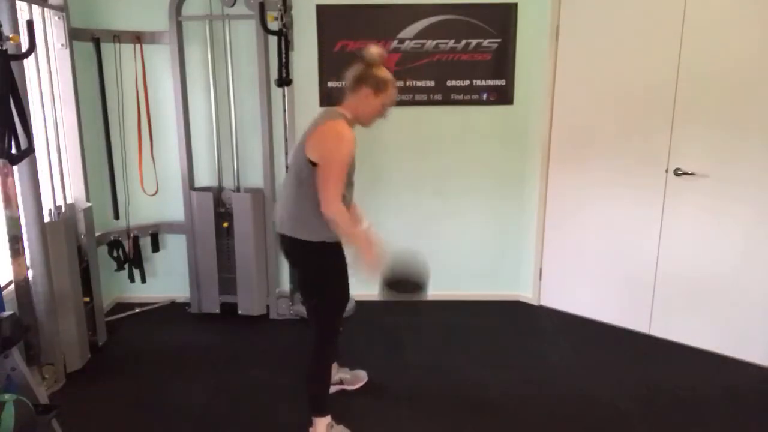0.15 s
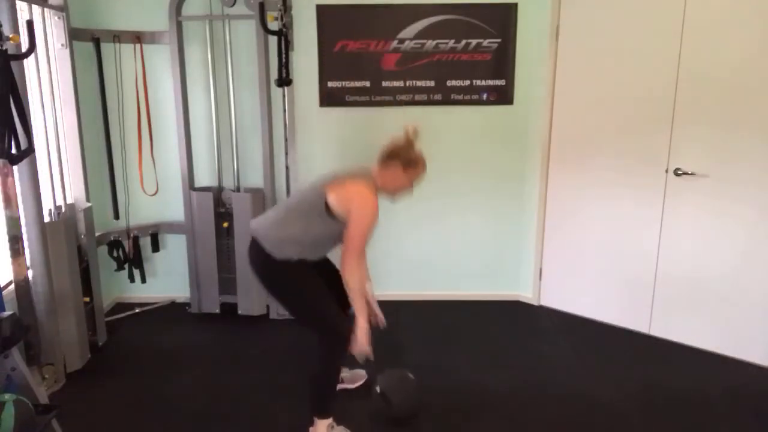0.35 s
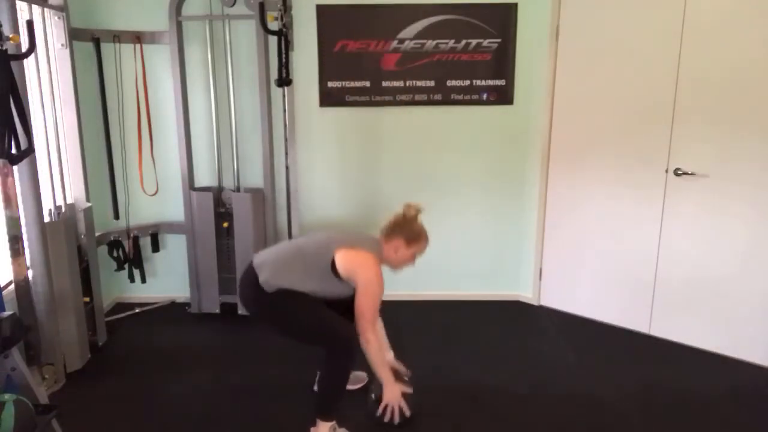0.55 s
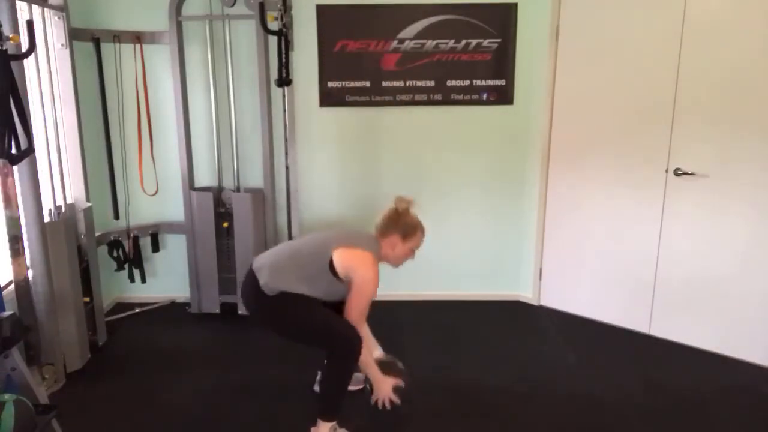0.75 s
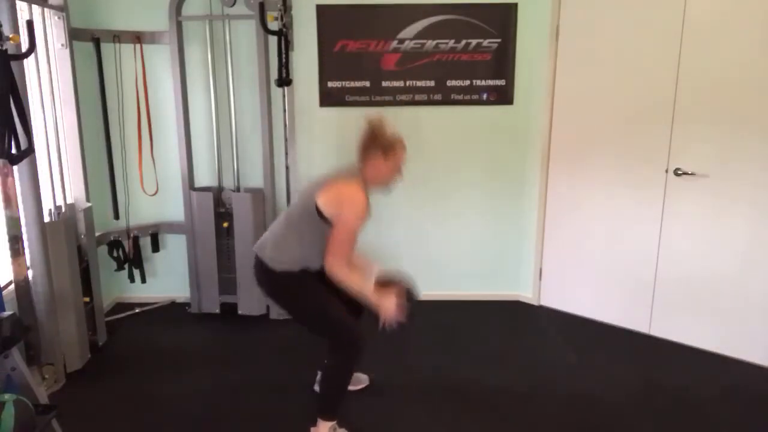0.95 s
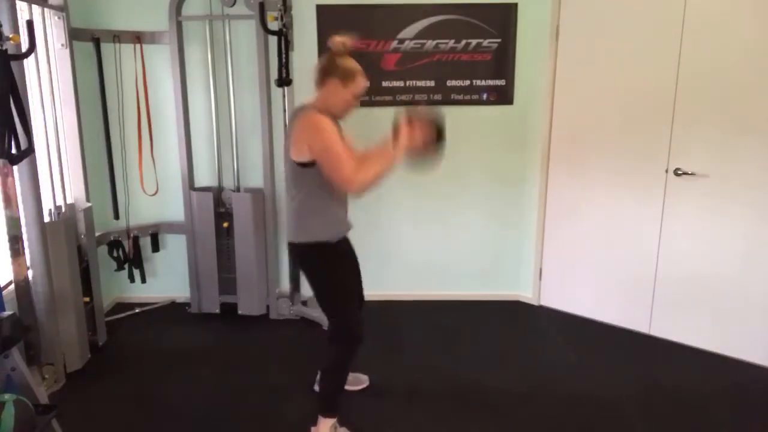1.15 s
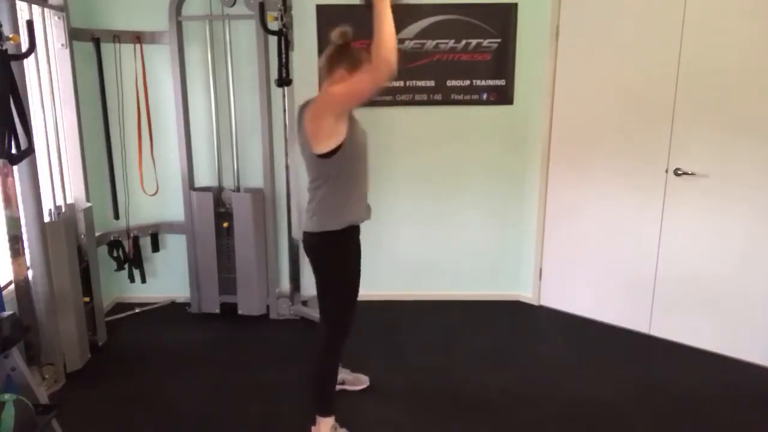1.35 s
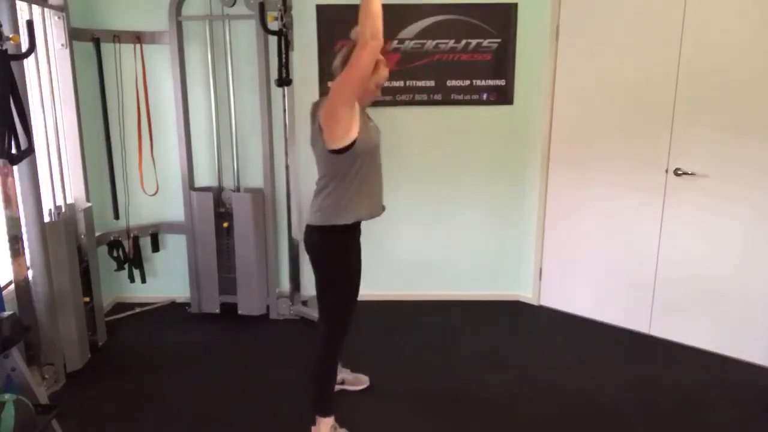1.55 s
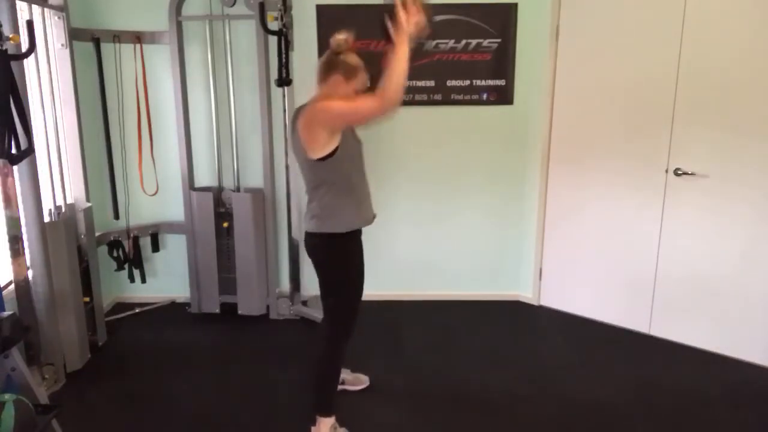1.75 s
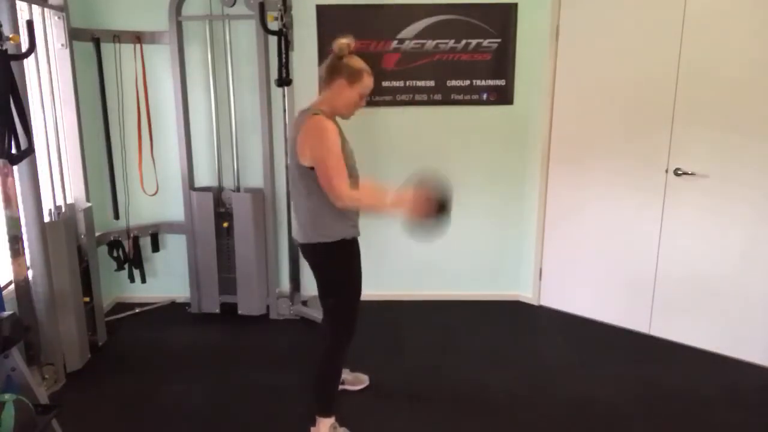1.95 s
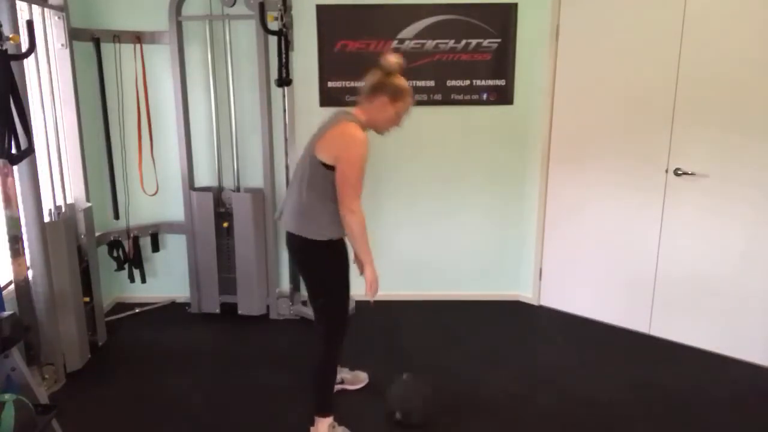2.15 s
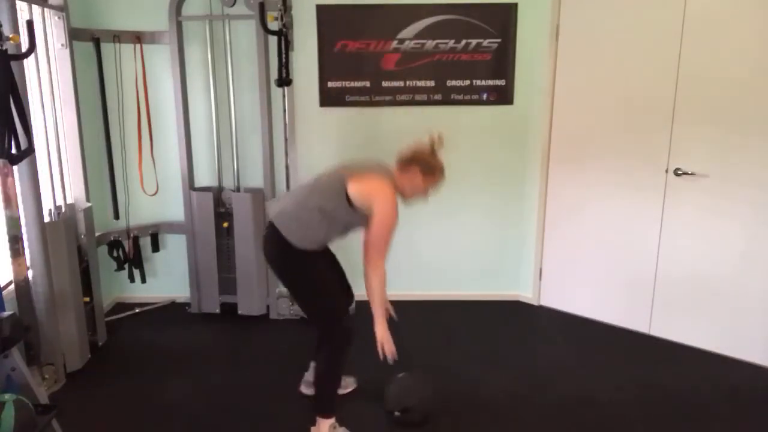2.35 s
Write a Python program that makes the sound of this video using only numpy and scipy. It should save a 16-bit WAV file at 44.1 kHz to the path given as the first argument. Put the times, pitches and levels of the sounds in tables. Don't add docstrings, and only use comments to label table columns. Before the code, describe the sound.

A heavy rubber slam ball hits a gym floor mat twice, each crack ringing through the room

```python
import sys
import numpy as np
from scipy import signal
from scipy.fft import rfft, irfft
from scipy.io import wavfile
from scipy.ndimage import uniform_filter1d

SR = 44100
rng = np.random.default_rng(int(sys.argv[2]) if len(sys.argv) > 2 else 0)


def wrap_up_sound(samples):
    columns = np.atleast_2d(samples).T
    tamed = np.clip(columns, -1, 1)
    steps = np.round(tamed * 32767).astype(np.int16)
    wavfile.write(sys.argv[1], SR, steps)


def voltage_ratio(decibels):
    exponent = np.asarray(decibels, float) / 20
    return 10 ** exponent


N = 110250
T = np.arange(N) / SR
BUILD_S = 0.0018


def level(x, db):
    return x * voltage_ratio(db) / np.sqrt(np.mean(x ** 2))


def read(table, hz):
    table = np.array(table, float)
    return np.interp(np.log(hz), np.log(table[:, 0]), table[:, 1])


def bands(size):
    f = np.fft.rfftfreq(size, 1 / SR) + 1
    spectrum = rfft(rng.standard_normal(size))
    for hz in 25 * 2 ** (np.arange(27) / 3):
        thirds_away = np.clip(3 * np.log2(f / hz), -1, 1)
        yield hz, irfft(spectrum * np.cos(thirds_away * np.pi / 2), size)


def walk(rate):
    k = int(SR / rate)
    steps = np.repeat(rng.standard_normal(N // k + 1), k)
    return 1.3 * uniform_filter1d(uniform_filter1d(steps, k), k)[:N]


def band(x, hz, q):
    return signal.lfilter(*signal.iirpeak(min(hz, .4 * SR), q, fs=SR), x)


def add(out, x, at_s):
    i = int(at_s * SR)
    out[i:i + len(x)] += x[:N - i]


def hum():
    # frequency in Hz, level in dB per Hz.
    colour = [(15, -54), (25, -25), (60, 1), (272, -6), (300, 0), (493, -11.5), (532, -9.5), (7230, -21.5),
              (9500, -27.5), (12400, -53.5), (20900, -120)]
    # time in seconds, gain in dB.
    swell_points = [(0, 3.5), (.8, 2), (1.1, 3), (1.4, 1.5), (1.8, 4.5), (2.5, 6)]
    swell_db = np.interp(T, *np.array(swell_points, float).T)
    floor = sum(x * voltage_ratio(read(colour, hz) + 0.5 * walk(7.84)) for hz, x in bands(size=N))
    return level(floor, -70.5) * voltage_ratio(swell_db)


def swishes():
    peaks_s = [.14, .62, 2.01, 1.08, 2.37]
    # level in dB, rise in seconds, fall in seconds, centre in Hz.
    rubs = [
        (-52.5, .035, .04, 9300),
        (-66.5, 0.052, 0.057, 4000),
        (-55.5, 0.031, 0.028, 5200),
        (-73.5, 0.13, 0.11, 2900),
        (-69.5, 0.081, .07, 2900),
    ]
    out = np.zeros(N)
    for s, (db, rise, fall, hz) in zip(peaks_s, rubs):
        distance = np.where(T < s, (s - T) / rise, (T - s) / fall)
        shape = np.exp(-distance ** 0.92)
        grain = voltage_ratio(1.1 * walk(150))
        hiss = band(rng.standard_normal(N), hz, 0.48) * grain
        out += shape * level(hiss, db)
    return out


def thuds():
    # peak time in seconds, level in dB, centre in Hz, length in seconds.
    touches = [(0.154, -63, 110, .01), (0.241, -60, 1000, 0.015), (.585, -60, 230, .02),
               (.608, -58, 500, .006), (0.619, -47, 890, .003), (.632, -58.5, 120, 0.018),
               (0.672, -59, 400, .008), (.708, -64, 400, 0.0068), (2.002, -56.5, 330, 0.0083),
               (2.114, -53.5, 997, 0.003), (2.206, -34, 900, .008), (2.38, -55.5, 720, 0.024),
               (1.33, -66, 200, 0.0069)]
    out = np.zeros(N)
    for s, db, hz, length in touches:
        t = T[:SR // 10] / length
        noise = rng.standard_normal(len(t))
        dull = level(band(band(noise, hz, 1.0), hz, 1.0), 0)
        add(out, voltage_ratio(db) * t * np.exp(1 - t) * dull, s - length)
    return out


def tail(colour):
    # frequency in Hz, time to fall 60 dB in seconds.
    decay = [(50, .6), (150, .55), (400, 0.69), (1200, 0.67), (3500, 0.65), (9000, 0.48)]
    early_db, early_t60_s, grain_db = 5.5, .25, 1.14
    t = T[:SR]
    early = voltage_ratio(early_db - 60 * t / early_t60_s)
    out = 0
    for hz, x in bands(size=SR):
        late = voltage_ratio(-60 * t / read(decay, hz))
        out = out + x * voltage_ratio(read(colour, hz)) * (late + early)
    out = out * (1 - np.exp(-t / BUILD_S)) * voltage_ratio(grain_db * walk(300)[:SR])
    return out / np.sqrt(np.mean(out[:SR // 20] ** 2))


def slap(at_s, end_hz, length_s):
    crack_hz, flatten_s = 4000, .00035
    t = np.maximum(T - at_s, 0)
    fallen = 1 - np.exp(-t / flatten_s)
    turns = end_hz * t + (crack_hz - end_hz) * flatten_s * fallen
    return -np.sin(2 * np.pi * turns) * np.exp(-t / length_s) * (1 - np.exp(-t / .0001))


def rings(at_s, column, gain_db):
    # frequency in Hz, 60 dB decay in seconds, level in dB in first slam, in dB in second slam.
    modes = [(60.6, 0.53, -39, -38), (120, 0.39, -35.5, -33), (166.7, .35, -36.5, -35.5),
             (223, 0.48, -34.5, -36.5), (256, 0.36, -30, -33.5), (293.5, 0.49, -36, -30),
             (320.7, .45, -33.5, -31.5), (351.8, 0.44, -27, -27.5), (399.4, 0.58, -28.5, -34.5),
             (416.7, 0.46, -28.5, -32.5), (448, 0.3, -31, -27.5), (579.3, 0.33, -30, -36.5),
             (620.3, 0.5, -32, -37), (780, .4, -32.5, -43)]
    longest_t60_s = .55
    pair_share, pair_gap = .55, .04
    t = np.maximum(T - at_s, 0)
    out = 0
    for row, turn in zip(modes, rng.random(len(modes))):
        hz = row[0]
        fade_db = -60 * t / min(row[1], longest_t60_s)
        beat = 1 + pair_share * np.cos(2 * np.pi * (pair_gap * hz * t + 7 * turn))
        tone = np.sin(2 * np.pi * (hz * t + turn))
        out = out + voltage_ratio(row[column] + gain_db(hz) + fade_db) * tone * beat
    return out * (1 - np.exp(-t / BUILD_S))


def body(at_s, modes):
    rise_s = 0.0088
    t = np.maximum(T - at_s, 0)
    ring = sum(voltage_ratio(db - 60 * t / t60) * np.sin(2 * np.pi * hz * t) for hz, db, t60 in modes)
    return (1 - np.exp(-t / rise_s)) * ring


def slams():
    # start in seconds, slap level in dB, end pitch in Hz, slap length in seconds.
    blows = [
        (.24833, -4, 950, .0013),
        (2.12022, -7.5, 300, .0018),
    ]
    # delay in seconds, level in dB.
    walls = [
        [(.0058, -13), (.0085, -11), (.0095, -9), (.0125, -13)],
        [(.0056, -6), (.0083, -8), (.0101, -10), (.0118, -7)],
    ]
    # frequency in Hz, level in dB, 60 dB decay in seconds.
    bodies = [
        [(379.6, -15.5, 0.083), (604, -20, 0.12), (1302, -22, 0.06)],
        [(400, -19, 0.11), (296, -25.5, .08), (1089, -24.5, 0.086)],
    ]
    # frequency in Hz, level in dB per Hz.
    colours = [
        [(30, -21.5), (150, -12), (500, -5.5), (800, -8), (1400, -6.5), (4000, -16.5), (7500, -26.5),
         (9500, -35.5)],
        [(30, -30.5), (150, -8), (500, -9), (1100, -6), (1700, -9.5), (4500, -13.5), (7500, -29.5), (9500, -28)],
    ]
    tails_db = [-24, -24.5]
    bounce_s, bounce_db, bounce_hz = 2.203, -7, 310
    out = np.zeros(N)
    for k, (s, db, hz, length) in enumerate(blows):
        out += voltage_ratio(db) * slap(s, hz, length)
        for lag, wall_db in walls[k]:
            out += voltage_ratio(db + wall_db) * slap(s + lag, hz, length)
        out += rings(s, 2 + k, lambda f: 0)
        out += body(s, bodies[k])
        add(out, voltage_ratio(tails_db[k]) * tail(colours[k]), s)
    return out + rings(bounce_s, column=3, gain_db=lambda f: bounce_db - 14 * abs(np.log2(f / bounce_hz)))


def traffic():
    # level in dB, half length in seconds, centre in Hz, sharpness (Q).
    layers = [
        (-67.5, 0.2, 625, 3),
        (-74, 0.23, 1560, 2.6),
    ]
    passing_s = 1.82
    out = np.zeros(N)
    for db, half, hz, q in layers:
        swell = np.exp(-((T - passing_s) / half) ** 2)
        out += swell * level(band(rng.standard_normal(N), hz, q), db)
    return out


def scene():
    small = thuds() + swishes()
    room = tail([(50, -0.5), (9000, -0.5)])
    wet = signal.fftconvolve(small, room / np.sqrt(np.sum(room ** 2)))[:N]
    return (hum() + small + voltage_ratio(-8) * wet + slams() + traffic())[None]


def low_pass(x):
    return signal.sosfilt(signal.butter(12, 10290, fs=SR, output="sos"), x)


def record(dry):
    top_cut = signal.cheby2(10, 18, 9200, fs=SR, output="sos")
    return low_pass(signal.sosfiltfilt(top_cut, dry))


dry = scene()
out = record(dry)
wrap_up_sound(out)
```